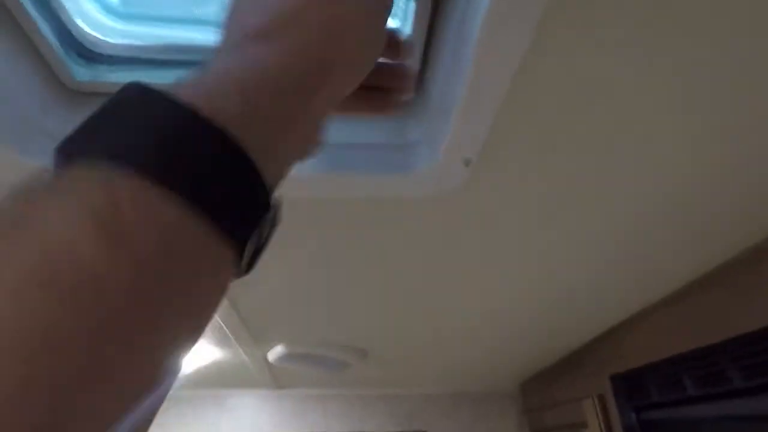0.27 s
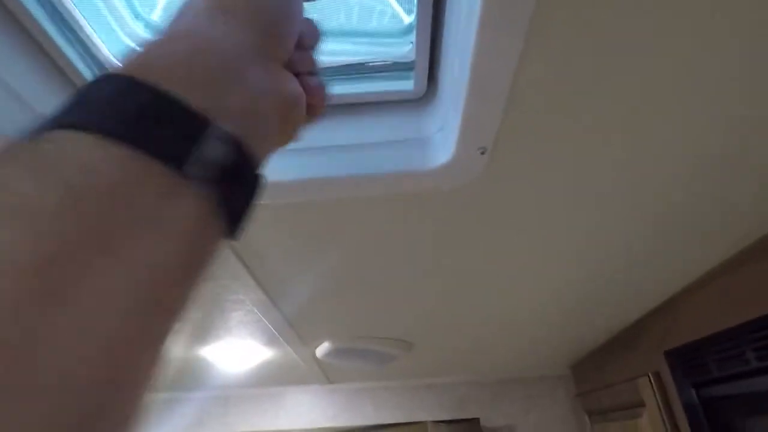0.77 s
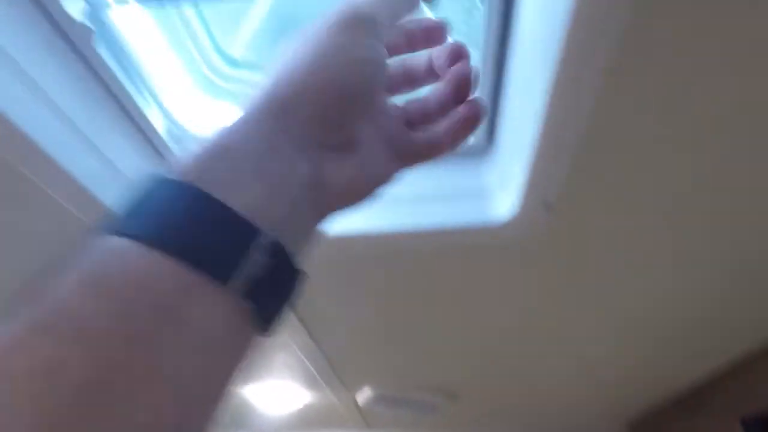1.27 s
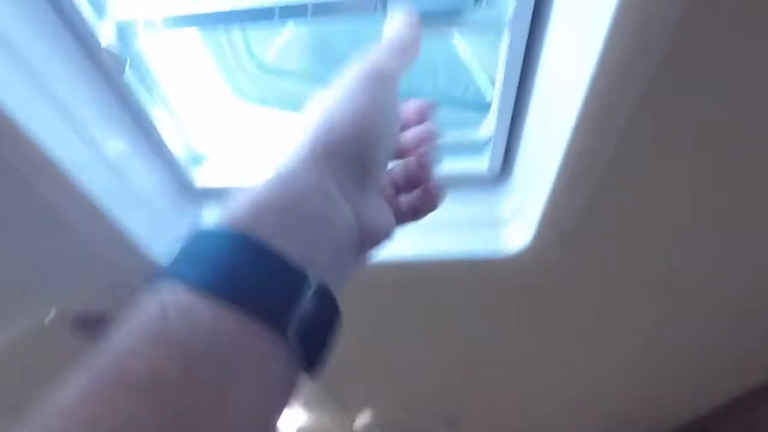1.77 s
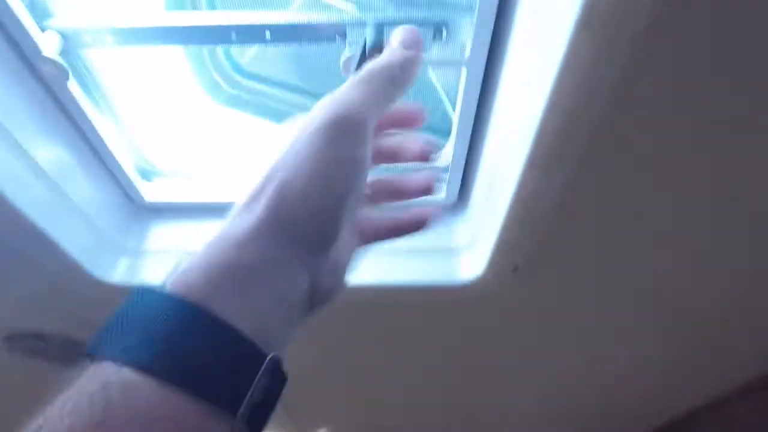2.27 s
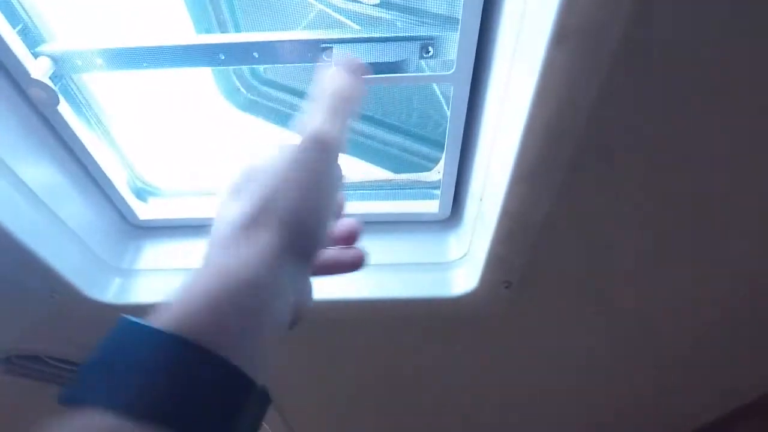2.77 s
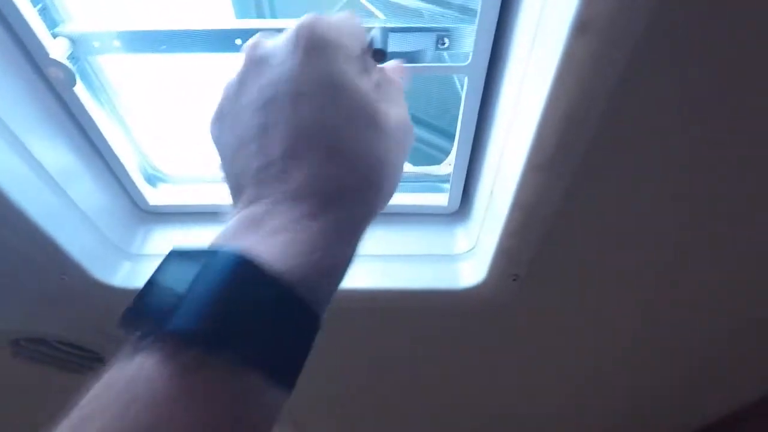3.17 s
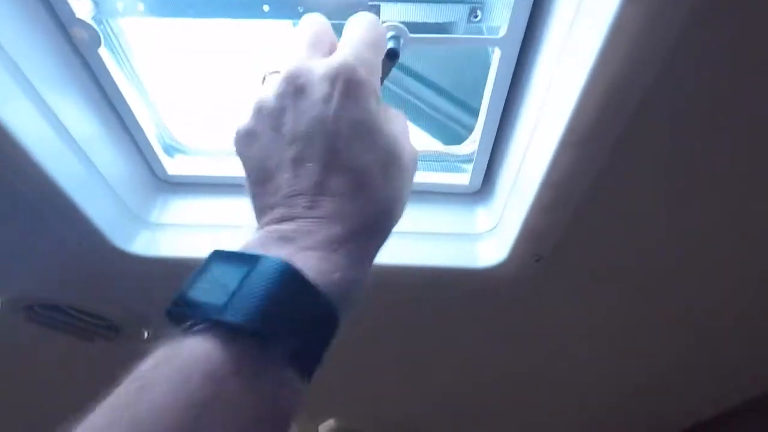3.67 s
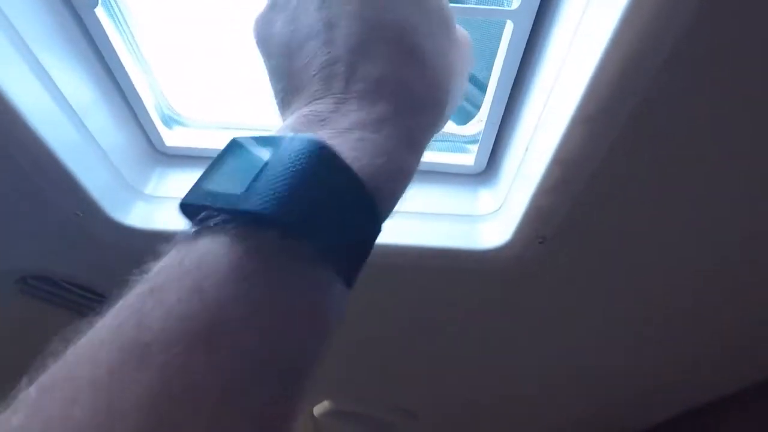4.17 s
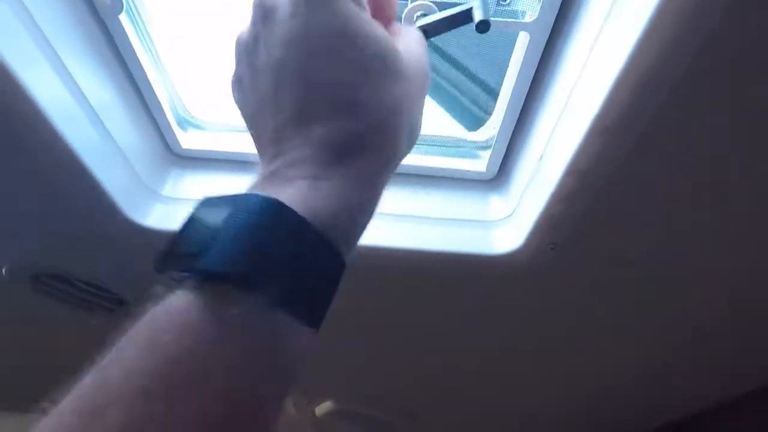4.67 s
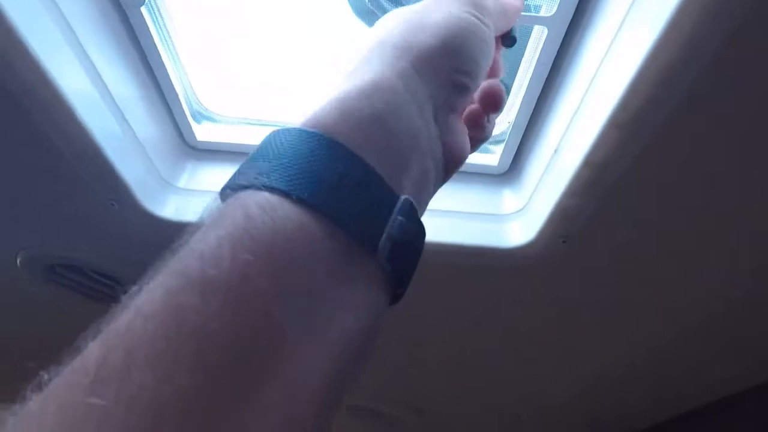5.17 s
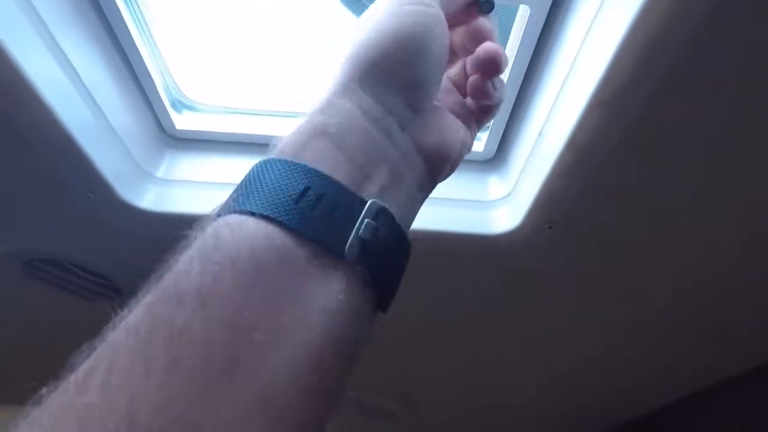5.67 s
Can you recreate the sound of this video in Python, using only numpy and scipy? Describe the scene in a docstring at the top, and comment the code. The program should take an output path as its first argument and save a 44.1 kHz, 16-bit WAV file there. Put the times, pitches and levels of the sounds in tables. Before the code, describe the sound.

A steady, slightly wavering low engine hum with body rumble and faint air hiss fills a small, dry camper interior; a very thin high electronic whine blips almost inaudibly. A loose plastic handle clacks sharply at 0.2 s, rubs softly near 0.35 s and clacks again at 0.6 s. Hollow juddering thumps follow at 0.7-0.95 s, and a click at 1.1 s. Stronger clusters of gear slips knock the roof panel at about 1.4-1.5, 1.9-2.0, 2.55, 3.0-3.1, 3.55-3.7 and 4.0-4.2 s, each a short run of dull jolts with dry rasp. Between them come bright handle clicks, notably at 2.17, 3.4 and 4.43 s. A thump at 4.65 s leads into quick rattling clicks, then lighter knocks around 5 s and a soft rub at 5.13 s. After a quieter gap, a firm knocking burst with a bright clack lands at 5.65-5.8 s. Close stereo microphone.

```python
"""Cranking a camper's roof vent

A hand turns the crank of a plastic roof vent, one short stroke after another.
The worm gear slips and judders under load: grains of noise rasp, jolts ring the modes of the roof panel.
The loose handle clacks when gripped or let go, and fingers rub on it.
An idling engine hums as wavering sines, over noise for rumble and hiss and a blipping sine for the whine.
Two microphone ports hear it with different level and phase."""
import sys
import numpy as np
from scipy import signal
from scipy.fft import rfft, irfft, next_fast_len
from scipy.io import wavfile
from scipy.ndimage import uniform_filter1d, minimum_filter1d

SR = 44100
rng = np.random.default_rng(int(sys.argv[2]) if len(sys.argv) > 2 else 0)


def digitize_waveform(pressure):
    """Quantize a signal to 16-bit integers and store it at the path in sys.argv[1].

    Rows of a 2-D input are taken as channels; values are limited to [-1, 1].
    """
    field = np.atleast_2d(pressure).T
    bounded = np.clip(field, -1, 1)
    quanta = np.round(bounded * 32767).astype(np.int16)
    wavfile.write(sys.argv[1], SR, quanta)


N = 261054

# How loud the air hiss is over time; the whine and one engine tone follow its swing.
# Each row: time in seconds, level in dB.
HISS_LEVEL = [(0.0, -53.5), (0.3, -51.5), (0.9, -46.5), (1.2, -50), (1.4, -46), (1.58, -50.5), (2.03, -50),
              (2.44, -49.5), (2.75, -52.5), (3.03, -51.5), (3.23, -55), (3.61, -53), (3.74, -57.5),
              (4.1, -52.5), (4.48, -55), (4.61, -51.5), (5.0, -53), (5.13, -50), (5.7, -47.5), (5.92, -46)]

KNOCK_HZ = 280   # roof modes below this thump, those above it knock
CLACK_LANDING_DB = 11   # lift of the crank modes where a clack or rub lands


def amp(db):
    """Turns decibels into a plain factor."""
    return 10 ** (np.asarray(db) / 20)


def rms_one(x):
    """Scales a sound to an average (rms) level of 1."""
    return x / np.sqrt(np.mean(x ** 2) + 1e-20)


def loudest(x):
    """Rms of the loudest 12 ms."""
    return np.sqrt(uniform_filter1d(x ** 2, size=530).max())


def in_time(rows):
    """Draws straight lines between the rows, one curve for each column after the time."""
    s, *columns = np.transpose(rows)
    return [np.interp(np.arange(N) / SR, s, c) for c in columns]


def at_hz(points, hz):
    """Reads a curve over frequency, with straight lines on a logarithmic pitch scale."""
    point_hz, value = np.array(points).T
    return np.interp(np.log(hz), np.log(point_hz), value)


def butter(x, hz, kind, order=2):
    """Butterworth filter."""
    return signal.sosfilt(signal.butter(order, hz, kind, fs=SR, output="sos"), x)


def drift(rate_hz):
    """Random wandering no faster than about rate_hz, with spread 1."""
    return rms_one(butter(rng.standard_normal(N + SR), rate_hz, "low")[SR:])


def coloured(spectrum, flicker_db):
    """Noise of the given spectrum whose level flickers; rms 1."""
    hz = np.maximum(np.fft.rfftfreq(N, 1 / SR), 1)
    noise = irfft(rfft(rng.standard_normal(N)) * amp(at_hz(spectrum, hz)), N)
    return rms_one(noise * amp(flicker_db * drift(13.0)))


def swing_db():
    """How far the hiss stands from its mean level."""
    hiss_db, = in_time(HISS_LEVEL)
    return hiss_db - hiss_db.mean()


def engine():
    """Sines at 1, 2 and 6 times the firing pitch, which wavers a little; all three wander in level."""
    # Level of the firing pitch, before it wanders. Each row: time in seconds, level in dB.
    firing_level = [(0.0, -17), (0.4, -26), (0.49, -26), (0.6, -11.5), (0.85, -22), (1.09, -16.5),
                    (1.369, -26), (1.53, -23), (1.7, -19), (1.999, -19.5), (2.439, -26), (2.65, -14.5),
                    (3.021, -28.5), (3.69, -19.5), (3.92, -25), (4.35, -22), (4.78, -17.5), (5.11, -30),
                    (5.551, -22), (5.92, -11)]
    # Level of the sixth order, before it wanders. Each row: time in seconds, level in dB.
    sixth_level = [(0.0, -32), (1.43, -24.5), (2.18, -26.5), (2.46, -22.5), (2.7, -28), (3.58, -28.5),
                   (3.69, -38.5), (3.89, -30), (4.1, -30), (4.48, -29), (5.52, -20.5), (5.92, -24)]
    firing_hz = 28.55   # at idle
    second_db, follows = -25, 0.64   # mean level; share of the hiss's swing it takes on
    phase = 2 * np.pi * np.cumsum(firing_hz * (1 + 0.0079 * drift(1.42))) / SR
    first, = in_time(firing_level)
    second = second_db + follows * swing_db() + 1.9 * drift(3.1)
    sixth, = in_time(sixth_level)
    hum = np.zeros(N)
    for order, db in ((1, first), (2, second), (6, sixth)):
        tone = np.sin(order * phase + rng.uniform(0, 2 * np.pi))
        hum += np.sqrt(2) * amp(db + 1.7 * drift(4.7)) * tone   # the root makes rms of a sine's peak
    return hum


def background():
    """Body rumble and air hiss, two shaped noises with their own level curves."""
    # Level of the body rumble. Each row: time in seconds, level in dB.
    rumble_level = [(0.0, -25), (0.33, -19.5), (1.42, -18.5), (1.58, -21), (1.81, -20), (2.09, -18.5),
                    (2.29, -20.5), (2.47, -18.5), (2.83, -21), (3.03, -19.5), (3.38, -24.5), (3.58, -23),
                    (3.76, -24), (3.92, -25), (4.04, -23), (4.19, -23.5), (4.47, -23.5), (5.06, -21),
                    (5.21, -19.5), (5.92, -18.5)]
    # Colour of the rumble; only the shape counts. Each row: frequency in Hz, relative level in dB per Hz.
    rumble_colour = [(12, -43), (20, -3), (43, -4.5), (92, -3.5), (173, -6), (192, -8.5), (236, -16),
                     (387, -18.5), (484, -31.5), (626, -31.5), (977, -47.5), (1200, -46), (1560, -66),
                     (2640, -120)]
    # Colour of the hiss; only the shape counts. Each row: frequency in Hz, relative level in dB per Hz.
    hiss_colour = [(410, -25.5), (700, 2), (990, -6.5), (1140, -6), (2560, -12), (4000, -18), (6190, -16),
                   (8530, -26.5), (9580, -27), (12200, -36), (15000, -79.5)]
    rumble_db, = in_time(rumble_level)
    hiss_db, = in_time(HISS_LEVEL)
    return amp(rumble_db) * coloured(rumble_colour, 1.0) + amp(hiss_db) * coloured(hiss_colour, 0.24)


def whine():
    """A thin electronic tone in regular blips: one long blip a cycle at first, later two short ones."""
    pitch_hz, mean_db, follows = 9350, -76, .7   # follows: share of the hiss's swing
    blips_per_s, first_blip_s, pace_change_s = 23.976, .0296, 2.4
    blip_s, trail_s, trail_db = 0.0022, .013, -4   # half width of a blip; the early ones trail on
    t = np.arange(N) / SR
    since = (t - first_blip_s + blip_s) % (1 / blips_per_s) - blip_s   # seconds from the blip's middle
    first = np.exp(-(since / blip_s) ** 2)
    second = np.exp(-((since - .5 / blips_per_s) / blip_s) ** 2)
    trail = amp(trail_db) * (since > 0) * np.clip((trail_s - since) / blip_s, 0, 1)
    gate = np.maximum(first, np.where(t < pace_change_s, trail, second))
    tone = np.sin(2 * np.pi * np.cumsum(pitch_hz + 40. * drift(30.)) / SR)
    return amp(mean_db + follows * swing_db()) * rms_one(gate * tone)


def handle():
    """Loose plastic strikes in sharp clacks, and fingers sliding on it give soft swelling rubs."""
    # Clacks of the handle. Each row: start in seconds, rasp peak in dB, top (treble) level in dB,
    # roof knock in dB, knock tilt in dB per octave, roof thump in dB, rattle against the rasp in dB,
    # favoured crank pitch in Hz.
    clacks = [(0.182, -24, -36, -23, 5.5, -17, -12, 1394),
              (0.58, -32.5, -45.5, -20.5, -3.5, -22, -18, 2710),
              (1.143, -31, -40.5, -28.5, -1.5, -26, -16, 3100),
              (1.516, -37.5, -47, -43, 0, -30.5, -19, 4070), (1.803, -38, -51, -30, 0, -27.5, -15, 2550),
              (2.1691, -27, -34, -25.5, 0, -27.5, -19, 5580),
              (2.1729, -21, -31, -17.5, 1.5, -20.5, -13.5, 2080),
              (2.3472, -30, -58, -33, -2, -27, -14.5, 1240), (2.4211, -35.5, -65, -35, -3, -27, -17, 2940),
              (2.7357, -40, -56, -42, 3, -29, -16.5, 1650), (2.9037, -32.5, -56, -27.5, -1, -29, -15, 2610),
              (3.1007, -33, -49, -22.5, -1.5, -26, -16, 1790), (3.2078, -37, -53, -47, 0, -32, -18, 1960),
              (3.278, -44, -62, -47.5, 0, -32.5, -16, 1900),
              (3.388, -24.5, -46, -26.5, -1, -27, -15.5, 3310),
              (3.6323, -36.5, -42, -48.5, 0, -30.5, -17.5, 4400),
              (3.8075, -51, -63, -51, 2, -34.5, -14, 2410), (3.963, -39, -58, -48, 0, -31.5, -14, 2600),
              (4.2509, -44.5, -70, -41.5, 2, -33, -17, 1770),
              (4.433, -25.5, -45, -25.5, 0.5, -26, -14, 3310),
              (4.564, -35.5, -62, -25, 1, -24.5, -16, 2600), (4.6884, -37.5, -52, -39.5, 0, -30, -16, 3310),
              (4.707, -46, -53, -48, 2, -29.5, -16, 4680), (4.725, -31.5, -53, -36, 0.5, -29, -14, 3220),
              (4.7379, -25, -45.5, -27, 1, -28, -14.5, 1970),
              (4.7775, -46, -47, -33.5, -0.5, -29.5, -16, 4680),
              (4.9398, -43, -65, -30.5, -1.5, -27, -14, 2330),
              (5.0127, -40, -56, -33, -2, -29.5, -16, 3070),
              (5.0512, -38.5, -46.5, -31, -1.5, -26, -19, 3490),
              (5.6476, -44, -50, -28.5, 0.5, -27.5, -16, 2070),
              (5.77, -29.5, -36, -17.5, 4, -19.5, -24, 5260),
              (5.8056, -35.5, -62, -44, 0.5, -30, -14, 2450)]
    # Fingers sliding. Each row: start in seconds, rasp peak in dB, top (treble) level in dB, roof knock
    # in dB, knock tilt in dB per octave, length in seconds, time for the tail to fall 60 dB in seconds.
    rubs = [(.348, -35.5, -45, -37.5, 2, 0.03, 0.14), (.376, -32.5, -44.5, -37.5, 2, 0.04, 0.3),
            (1.428, -27.5, -41.5, -23.5, 1.5, 0.027, 0.14), (4.651, -40.5, -56, -38.5, -3.5, 0.05, 0.17),
            (5.13, -59, -64, -25.5, 1.5, 0.089, 0.95)]
    clack_thump_hz, clack_s, clack_t60_s = 206.6, 0.0031, 0.098
    rub_thump_db, rub_ring_hz, rub_thump_hz, rub_rattle_db = -21.5, 2600, 160, -29
    clack_rows = [(s, rasp, top, knock, tilt, thump, ring_hz, clack_thump_hz, clack_s, clack_t60_s, rattle)
                  for s, rasp, top, knock, tilt, thump, rattle, ring_hz in clacks]
    rub_rows = [(s, rasp, top, knock, tilt, rub_thump_db, rub_ring_hz, rub_thump_hz, length, t60, rub_rattle_db)
                for s, rasp, top, knock, tilt, length, t60 in rubs]
    # in a clack the rasp and treble start a moment (lead_s) before the knock and thump
    struck = contacts(clack_rows, 0.0028, CLACK_LANDING_DB, rise_s=0.004426, snap_db=6,
                      jolts_per_s=1200.0, blow_db=6.0, ring_db=1.0, grit_db=-1.7)
    rubbed = contacts(rub_rows, 0, CLACK_LANDING_DB, rise_s=0.015, snap_db=-21.0,
                      jolts_per_s=1300.0, blow_db=-9.5, ring_db=-10.5, grit_db=5.5)
    return struck + rubbed


def gear():
    """The worm gear slips under load: each slip is a run of coarse jolts with a rasp."""
    # Gear slips. Each row: start in seconds, roof thump in dB, roof knock in dB, knock tilt in dB per
    # octave, rasp peak in dB, top (treble) level in dB, favoured crank pitch in Hz,
    # favoured thump pitch in Hz, length in seconds.
    slips = [(0.7067, -15.5, -32, 0, -37, -71, 1390, 66, 0.02),
             (0.752, -15, -33, 1, -60, -47, 3490, 66, 0.0089),
             (0.8874, -13.5, -24, -1, -46, -56, 6220, 188, 0.017),
             (0.93, -8, -22.5, 4.5, -54.5, -46.5, 4680, 137.4, 0.024),
             (1.388, -15.5, -25.5, 8.5, -48, -47, 5600, 140.5, 0.0045),
             (1.395, -12.5, -22.5, -0.5, -54, -45, 5670, 155, 0.004),
             (1.425, -6.5, -25.5, -6, -31, -40.5, 3320, 156, 0.03),
             (1.49, -11, -17.5, 5.5, -53, -39.5, 5600, 123, 0.02),
             (1.509, -14.5, -22, -5, -50, -44, 6220, 97.5, 0.006),
             (1.52, -11.5, -19.5, -0.5, -52, -57, 1390, 155, 0.0053),
             (1.8916, -11, -21, -1, -46, -46.5, 5820, 160, 0.018),
             (1.925, -13, -19, -4.5, -47, -45, 7050, 116, 0.019),
             (1.97, -6.5, -19, 0.5, -53, -46, 7050, 109, 0.03),
             (2.0282, -11, -28, 5, -62, -52, 7050, 66, 0.0089),
             (2.525, -10.5, -19.5, -2.5, -50, -48, 4680, 155, 0.009),
             (2.538, -6.5, -15, 0, -41, -42.5, 7050, 168.4, 0.014),
             (2.551, -15.5, -17.5, 4, -42.5, -47, 1360, 160, 0.011),
             (2.578, -9, -19.5, 3, -41, -47.5, 7050, 126, 0.019),
             (2.986, -8, -18, -2.5, -44, -45, 5630, 145, 0.023),
             (3.0156, -13.5, -25.5, -6, -47, -55, 5500, 80.7, 0.0049),
             (3.038, -10, -19, 5.5, -48, -49, 7050, 124, 0.024),
             (3.0885, -8.5, -21, 3.5, -36, -48.5, 6220, 100.3, 0.0075),
             (3.1, -3.5, -16.5, -4.5, -47, -52, 6220, 160, 0.004),
             (3.542, -8.5, -18, 0.5, -38, -44, 2220, 133.4, 0.023),
             (3.5847, -13.5, -21.5, 3.5, -38.5, -46.5, 2650, 121.3, 0.012),
             (3.609, -11.5, -21, 4, -44, -54.5, 2250, 150.6, 0.008),
             (3.628, -2.5, -17, 3.5, -37, -46, 4430, 173, 0.018),
             (3.675, -15, -25.5, 0.5, -42, -57, 1480, 166.6, 0.025),
             (3.7117, -28, -31.5, -7, -46, -61, 2220, 66.4, 0.015),
             (4.0332, -5, -20, 5.5, -43.5, -52, 2600, 159, 0.017),
             (4.071, -7, -19, 5, -39.5, -50.5, 2600, 137.6, 0.019),
             (4.1127, -12, -20, 5, -51, -54, 2600, 191, 0.014),
             (4.139, -14.5, -29, -0.5, -52, -53, 5500, 130.6, 0.0081),
             (4.15, -13, -19.5, -4, -49, -56, 2600, 148.6, 0.0055),
             (4.162, -10.5, -23, 1.5, -46, -55, 6220, 147.4, 0.0091),
             (4.2035, -29.5, -59, -6, -56, -53.5, 3310, 66, 0.031),
             (4.6453, -7, -22, -1, -42.5, -49.5, 5500, 190, 0.023),
             (4.694, -17, -27, -1.5, -54, -57, 1380, 66, 0.0044),
             (4.9536, -15, -21.5, -5, -34.5, -56, 2050, 171.4, 0.0078),
             (5.177, -17, -23.5, -0.5, -57, -62, 1390, 165, 0.0078),
             (5.733, -7.5, -12.5, -3, -36, -44.5, 2600, 187, 0.026),
             (5.752, -15.5, -16, 6, -34, -52, 1380, 160, 0.011),
             (5.779, -20.5, -22.5, -5, -55, -65, 1390, 187, 0.0024)]
    tail_t60_s, rattle_db = 0.07, -28.5   # rattle against the rasp
    rows = [(s, rasp, top, knock, tilt, thump, ring_hz, thump_hz, length, tail_t60_s, rattle_db)
            for s, thump, knock, tilt, rasp, top, ring_hz, thump_hz, length in slips]
    # the rasp and treble start a moment (lead_s) before the knock and thump
    return contacts(rows, .0015, landing_db=9, rise_s=0.0061, snap_db=-20.5,
                    jolts_per_s=550.0, blow_db=15.5, ring_db=-7.0, grit_db=4.5)


def contacts(rows, lead_s, landing_db, rise_s, snap_db, jolts_per_s, blow_db, ring_db, grit_db):
    """Each contact rises, holds and dies; it rasps, rings the crank and shakes the roof."""
    split_hz, roll_off_hz = 2870, 7320   # split between rasp and top
    out = np.zeros(N + SR)
    for s, rasp_db, top_db, knock_db, tilt, thump_db, ring_hz, thump_hz, length, t60, rattle_db in rows:
        t = np.arange(int(SR * min(length + t60 + .12, .4))) / SR
        after = np.maximum(t - length, 0)   # seconds since the contact was over
        held = amp(-60 * after / max(t60, .01))
        snap = 1 + amp(snap_db) * np.exp(-np.abs(t - rise_s) / 0.00086)   # hardest at full contact
        slip = held * np.minimum(t / rise_s + 1e-3, 1) * snap * grains(9000.0, grit_db, size=len(t))
        sound = scrape(slip, ring_hz, landing_db, ring_db, length + rise_s)

        rasp = butter(sound, split_hz, "low", order=4)
        loose = rattle(t, ring_hz, rise_s)
        rasp = rasp / np.abs(rasp).max() + amp(rattle_db) * loose / loudest(loose)
        top = butter(sound, split_hz, "high", order=4) * amp(-60 * after / 0.28)   # extra treble damping

        jolts = held * np.minimum(1.4 * t / rise_s + 0.31, 1) * grains(jolts_per_s, 2.16, size=len(t))
        jolts[round(rise_s * SR)] = amp(blow_db)   # one firm blow at full contact
        knock, thump = roof(butter(jolts, 3100, "low"), tilt, thump_hz)
        thump = thump * amp(-60 * after / 0.13)   # the loaded gear stills the roof
        knock = knock * amp(-60 * np.maximum(t - length - .01, 0) / t60)

        i, early = round(s * SR), round((s - lead_s) * SR)
        out[early:early + len(t)] += amp(rasp_db) * rasp + amp(top_db) * top / loudest(top)
        for part, db in ((knock, knock_db), (thump, thump_db)):
            out[i:i + len(t)] += amp(db) * part / loudest(part)
    below = butter(out[:N], roll_off_hz, "low", order=6)
    return below + amp(-16.5) * butter(out[:N], roll_off_hz, "high")   # little gets past the roll-off


def grains(per_s, spread_db, size):
    """Uneven stick-slip clicks of random sign; the first one is certain."""
    sizes = amp(spread_db * np.minimum(rng.exponential(1, size), 4)) * rng.choice([-1, 1], size)
    return sizes * ((rng.random(size) < per_s / SR) | (np.arange(size) == 0))


def scrape(slip, ring_hz, landing_db, ring_db, touch_s):
    """Bare friction noise plus the crank's ring, strongest in modes near where the contact lands."""
    # Crank modes. Each row: pitch in Hz, relative level in dB, time to fall 60 dB in seconds.
    crank_modes = [(1240, 9, 0.18), (1394, 5, 0.076), (1546, 4.5, 0.11), (1750, -1, 0.06),
                   (1970, -1.5, 0.08), (2230, 2, 0.042), (2600, 2, 0.094), (2570, 0.5, 0.017),
                   (3150, -9.5, 0.069), (3310, -5, 0.077), (3490, -1.5, 0.031), (4070, -25, 0.07),
                   (4680, 3.5, 0.15), (5260, 7.5, 0.034), (5580, 8.5, 0.025), (6220, 10.5, 0.08),
                   (7050, 9, 0.055)]
    landing_octaves = .07   # width of the lift around the favoured pitch
    mix = [(hz, db + landing_db * np.exp(-(np.log2(hz / ring_hz) / landing_octaves) ** 2), t60)
           for hz, db, t60 in favour(crank_modes, ring_hz, 4.2, 6.1)]
    friction = rms_one(butter(slip, [1000, 8700], "band"))
    return friction + amp(ring_db) * gripped(slip, mix, touch_s)


def gripped(force, modes, touch_s):
    """The crank rings with the force; after the touch the hand stills it."""
    grip_t60_s = .035
    t = np.arange(len(force)) / SR
    return rms_one(body(force, modes) * amp(-60 * np.maximum(t - touch_s, 0) / grip_t60_s))


def rattle(t, ring_hz, rise_s):
    """Loose parts rattle on: clicks filtered up to a little over the ring within bounds, dying away."""
    high_hz = np.clip(1.15 * ring_hz, 1600, 3560)
    clicks = butter(grains(2500.0, 1.4, size=len(t)), [950, high_hz], "band")
    return clicks * amp(-60 * t / 0.16) * np.minimum(t / rise_s, 1)


def roof(jolts, tilt, thump_hz):
    """The jolts ring the roof panel: high modes knock, low modes thump."""
    # Roof modes. Each row: pitch in Hz, relative level in dB, time to fall 60 dB in seconds.
    roof_modes = [(74.8, 1, 0.66), (79, -13, 0.39), (116, -3.5, 0.28), (162.8, 3, 0.075), (180.6, 2, 0.075),
                  (218.8, -8, 0.097), (325, -2, 0.047), (368.5, 1.5, 0.036), (408, -1.5, 0.046),
                  (540, -19, 0.085), (579, -13.5, 0.037), (706, -19.5, 0.029), (830, -21, 0.028),
                  (1020, -32.5, 0.012), (1190, -35, 0.015)]
    high = [m for m in roof_modes if m[0] > KNOCK_HZ]
    low = [m for m in roof_modes if m[0] < KNOCK_HZ]
    knock = body(jolts, favour(high, KNOCK_HZ, -tilt, 1.74))
    thump = body(jolts, favour(low, thump_hz, 21.4, 1.0))
    return knock, thump


def favour(modes, main_hz, near_db, chance_db):
    """Where a contact lands decides the mix: modes lose near_db an octave from the main pitch, plus chance."""
    return [(hz, db - near_db * abs(np.log2(hz / main_hz)) + rng.normal(0, chance_db), t60)
            for hz, db, t60 in modes]


def body(force, modes):
    """The force rings all modes, signs alternating; rms 1."""
    return rms_one(sum((-1) ** k * amp(db) * ring(force, hz, t60)
                       for k, (hz, db, t60) in enumerate(modes)))


def ring(force, hz, t60):
    """One mode of a body: a resonator that falls 60 dB in t60 seconds."""
    r, w = amp(-60 / (t60 * SR)), 2 * np.pi * hz / SR
    return signal.lfilter([0, np.sin(w)], [1, -2 * r * np.cos(w), r * r], force + 1e-18)


def cabin(x):
    """Short dense reflections of the small upholstered space: a dying noise tail of power 1."""
    t60_s = 0.19
    t = np.arange(SR // 3) / SR
    tail = butter(rng.standard_normal(len(t)), 2000, "low", order=1) * amp(-60 * t / t60_s)
    return signal.fftconvolve(x, tail / np.linalg.norm(tail))[:N]


def scene():
    """The sound common to both ports, and the diffuse sound that is unlike at them."""
    crank = handle() + gear()
    common = engine() + background() + whine() + crank + amp(-13) * cabin(crank)
    diffuse = background() + amp(-2) * cabin(crank)
    return np.array([common, diffuse])


def gain_control(ports):
    """Loud peaks pull the gain of both ports down within milliseconds; it creeps back."""
    threshold_db, squeeze = -4, 0.32   # squeeze: share of the excess taken off
    recover_db_per_s, grab_s = 3.5, 0.0038
    ramp = recover_db_per_s * np.arange(N) / SR
    excess = np.maximum(20 * np.log10(np.abs(ports).max(axis=0) + 1e-9) - threshold_db, 0)
    held = np.maximum.accumulate(excess + ramp) - ramp   # holds each peak, sinking steadily
    r = np.exp(-1 / (grab_s * SR))
    return ports * amp(-squeeze * signal.lfilter([1 - r], [1, -r], held))


def limiter(ports):
    """Looks ahead and holds both ports under the ceiling with one gain."""
    ceiling_db, span = -1, int(.004 * SR)
    room = np.minimum(ceiling_db - 20 * np.log10(np.abs(ports).max(axis=0) + 1e-9), 0)
    return ports * amp(uniform_filter1d(minimum_filter1d(room, size=2 * span), size=span))


def record(dry):
    """Two ports differ in level and phase, the left weak near 450 Hz; gain, limiter, end fade and top cut."""
    # Level of the left port over the right. Each row: frequency in Hz, level in dB.
    left_over_right = [(60, -2.5), (99, -2.5), (160, -4.5), (270, -6), (450, -17.5), (740, -11.5),
                       (1220, -3.5), (2010, 2.5), (3330, -2), (5500, 0.5), (9080, -4), (15000, -15)]
    # How far the left port's phase leads. Each row: frequency in Hz, lead in radians.
    left_lead = [(20, 0), (300, 0), (430, .3), (540, 1.8), (690, 3.0), (1200, 1.1), (2200, .4), (2700, -.2),
                 (5500, .2), (8000, .6), (16000, .6)]
    # Gain of the sound unlike at both ports. Each row: frequency in Hz, gain in dB.
    diffuse_gain = [(20, -26.5), (200, -26.5), (500, -25.5), (1000, -9), (2500, -7), (5000, -6.5),
                    (9000, 2), (16000, -7.5)]
    cutoff_hz, fade_s, pad = 15500, .003, 2048   # pad in samples, mirrored at both ends
    size = next_fast_len(N + 8192)
    hz = np.maximum(np.fft.rfftfreq(size, 1 / SR), 1)
    direct, diffuse = rfft(np.pad(dry, ((0, 0), (pad, pad)), "reflect"), size)
    ratio = amp(at_hz(left_over_right, hz)) * np.exp(1j * at_hz(left_lead, hz))
    unlike = amp(at_hz(diffuse_gain, hz)) * diffuse
    left = 2 * ratio / (1 + ratio) * direct + unlike   # the two ports average to the direct sound
    right = 2 / (1 + ratio) * direct - unlike
    ports = irfft([left, right], size)[:, pad:N + pad]
    fade = np.minimum(np.arange(N)[::-1] / (fade_s * SR), 1)
    ports = limiter(gain_control(ports)) * fade
    return signal.sosfilt(signal.cheby2(12, 70, cutoff_hz, fs=SR, output="sos"), ports)


dry = scene()
out = record(dry)
digitize_waveform(out)
```